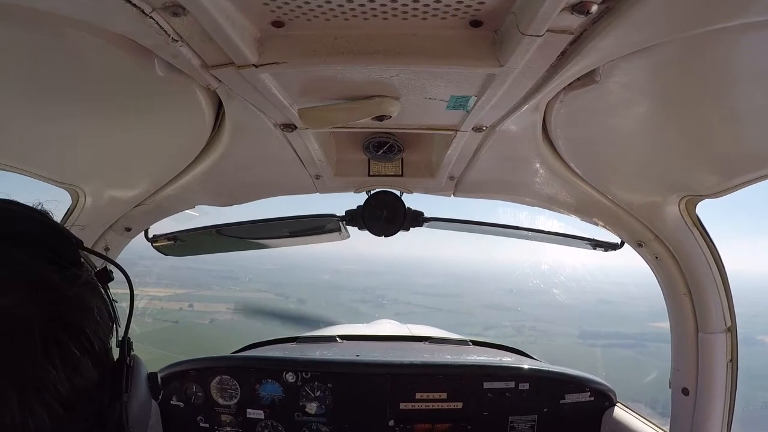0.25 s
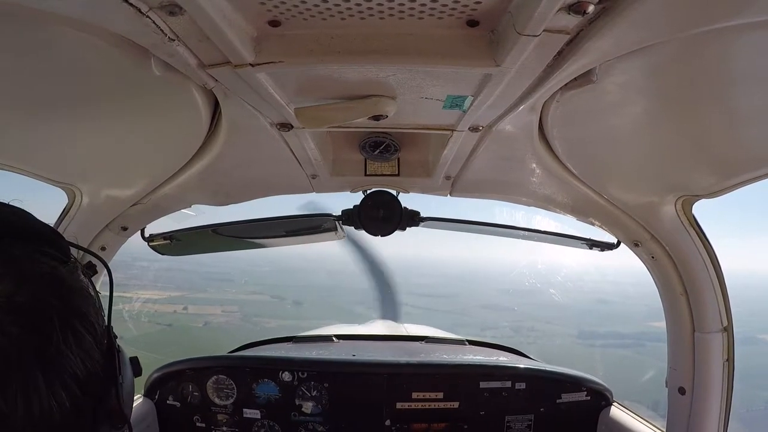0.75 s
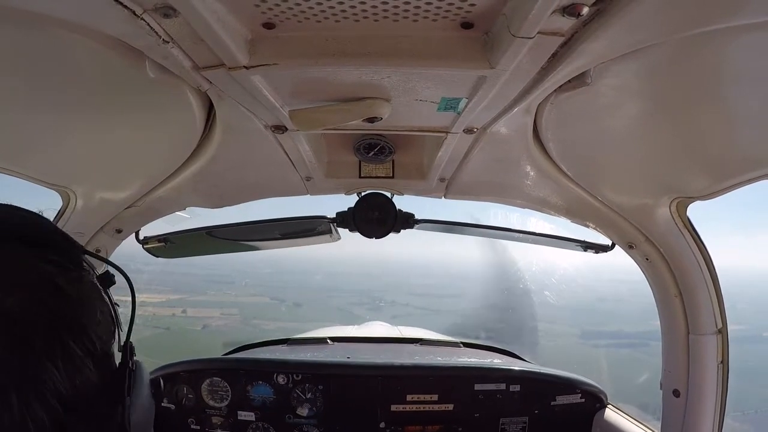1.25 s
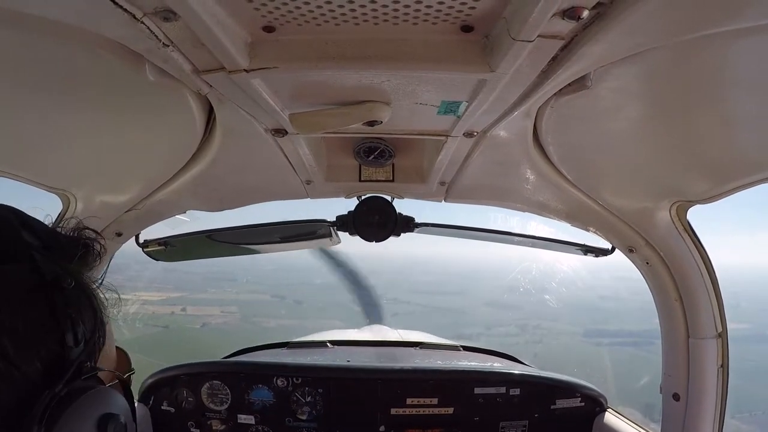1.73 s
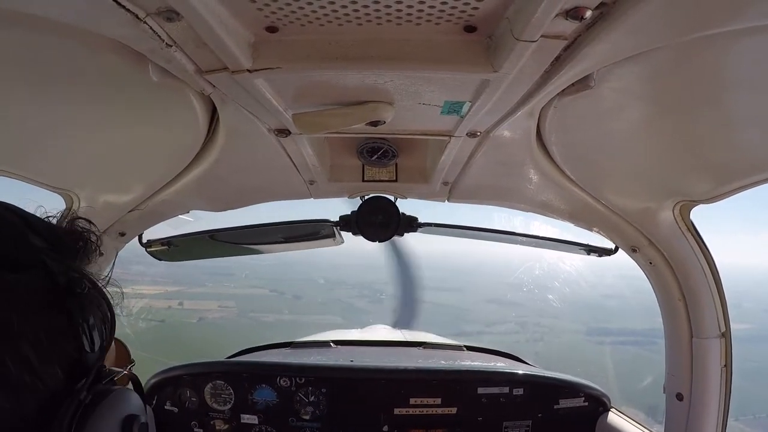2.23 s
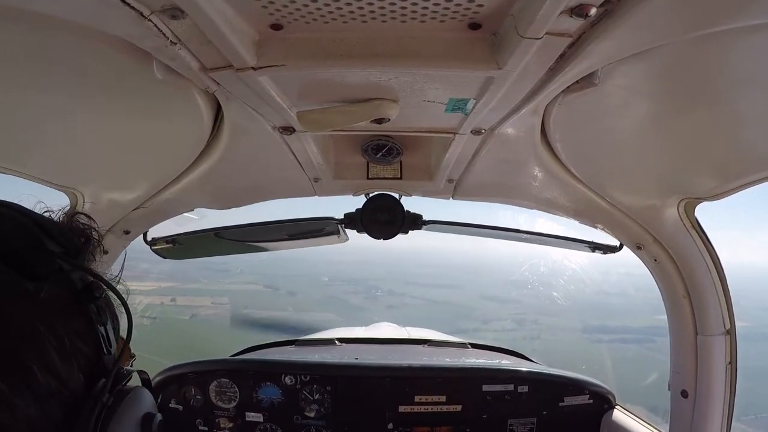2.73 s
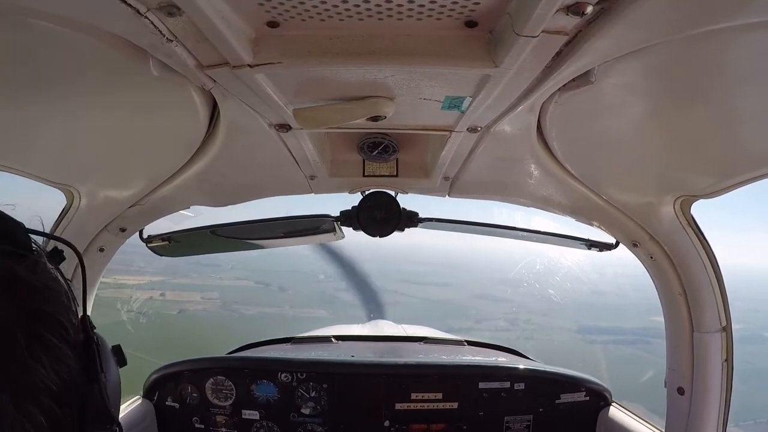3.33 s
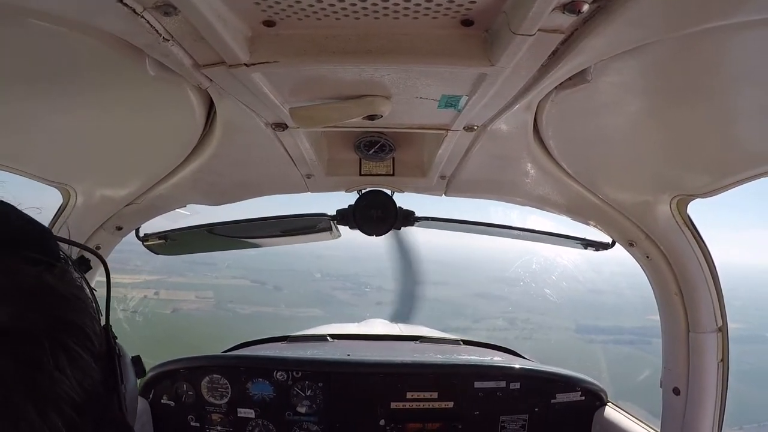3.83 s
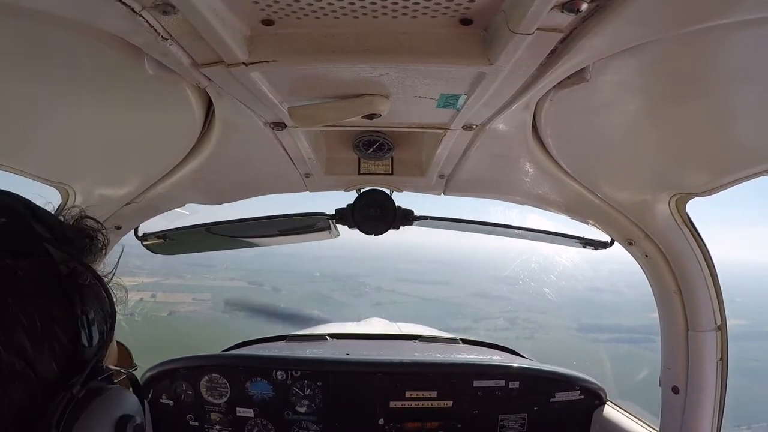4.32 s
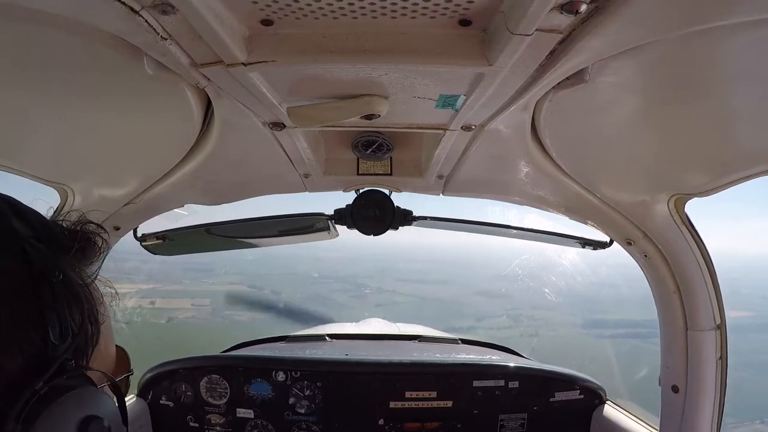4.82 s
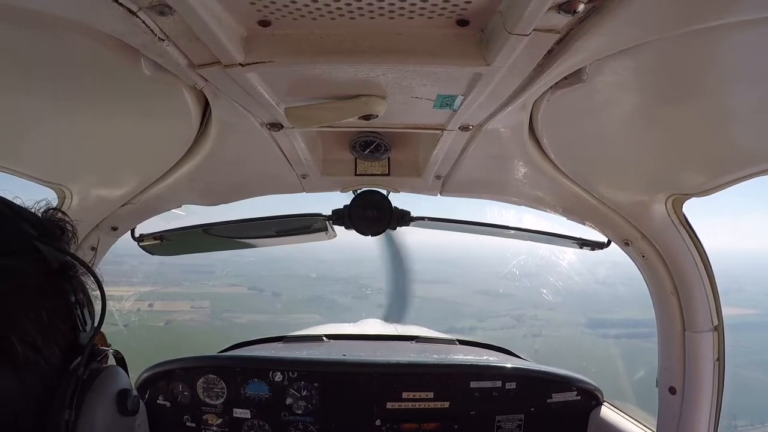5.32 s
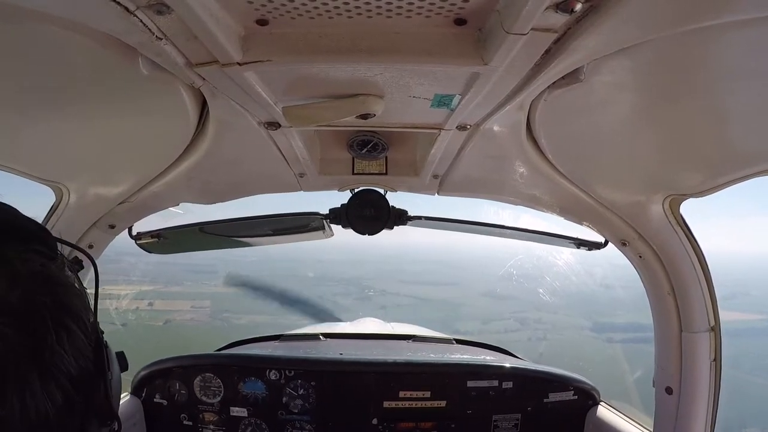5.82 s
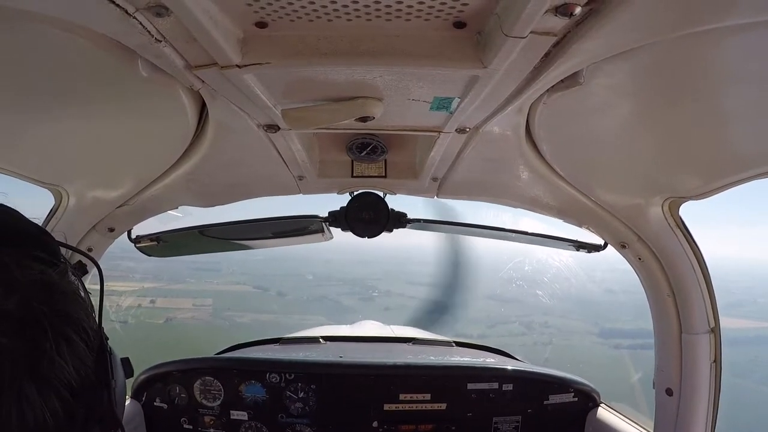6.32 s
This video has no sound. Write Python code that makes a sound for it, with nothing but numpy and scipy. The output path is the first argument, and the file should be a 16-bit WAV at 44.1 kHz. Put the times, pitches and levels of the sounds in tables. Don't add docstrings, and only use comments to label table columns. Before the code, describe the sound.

A low buzzing piston engine and propeller hum fills a light plane's cabin, easing down gradually amid airflow rumble, roar and faint hiss.

```python
import sys
import numpy as np
from scipy import signal
from scipy.io import wavfile
from scipy.ndimage import uniform_filter1d

SR = 44100
rng = np.random.default_rng(int(sys.argv[2]) if len(sys.argv) > 2 else 0)


def magnitude_from_level(level_db):
    exponent = np.asarray(level_db, float) / 20
    return 10 ** exponent


def master_out(mix):
    frames = np.transpose(np.atleast_2d(mix))
    ceiling = np.clip(frames, -1, 1)
    pcm = np.round(ceiling * 32767).astype(np.int16)
    wavfile.write(sys.argv[1], SR, pcm)


N = 289296
T = np.arange(N) / SR
CRUISE_HZ = 64.9

# start_s, length_s, firing_rate_fall_hz
THROTTLE_PULLS = [
    (.92, .92, 2.5),
    (2.02, 1.12, 3.8),
    (3.72, 1.05, 5.5),
]


def firing_hz():
    return CRUISE_HZ - sum(fall_hz * ramp(start_s, length_s) for start_s, length_s, fall_hz in THROTTLE_PULLS)


# mode_hz, width_hz, gain_db, phase_lag_below_turns
CABIN_MODES = [(90, 4, -5, .4), (97, 6, 3.5, 0), (113, 3.5, -9, .45), (119, 11, 4.5, .1), (187, 6, -3, .35),
               (194, 9, 15.5, 0), (247, 5, -5, .5), (256.5, 5, 8.5, .2)]


def cabin(hz):
    grid_hz = np.linspace(hz.min(), hz.max(), num=300)
    mode_hz, width_hz, mode_db, lag_turns = np.transpose(CABIN_MODES)
    detune = 2 * (grid_hz[:, None] - mode_hz) / width_hz
    gain_db = (mode_db / (1 + detune ** 2)).sum(axis=1)
    angle = (lag_turns * (2 * np.arctan(detune) - np.pi)).sum(axis=1)
    return np.interp(hz, grid_hz, gain_db), np.interp(hz, grid_hz, angle)


# time_s, level_db
FIRING_STUMBLES = [
    (.92, -0.8),
    (3.6, 0),
    (3.97, -2.5),
    (4.5, -1.8),
]
# firing_rate_multiple, slowest_rms_db, cruise_rms_db, phase_turns
ENGINE_ORDERS = [(.25, -37, -39, .1), (.5, -28.5, -29, .33), (.75, -21, -32, .36), (1, -14, -10.6, 0),
                 (1.25, -31, -27, .2), (1.5, -26, -26, .7), (1.75, -33, -39, .4), (2, -18.8, -27.5, .65),
                 (2.25, -36, -38, .6), (2.5, -36, -47, .1), (3, -33, -43.5, .64), (3.5, -49, -39, .3),
                 (4, -36, -30, .58), (5, -43, -37, .4), (6, -48, -43, .9)]


def engine():
    smooth_hz, smooth_width_hz, smooth_db = 62.2, 1.5, -8.5
    hz = firing_hz()
    speed = (hz - hz[-1]) / (hz[0] - hz[-1])
    mounts_db = smooth_db * np.exp(-((hz - smooth_hz) / smooth_width_hz) ** 2)
    load_db = bumps(FIRING_STUMBLES, width_s=0.096)
    turns = np.cumsum(hz * (1 + .003 * drift(6))) / SR
    out = np.zeros(N)
    for multiple, slow_db, cruise_db, phase_turns in ENGINE_ORDERS:
        cabin_db, cabin_angle = cabin(multiple * hz)
        level_db = slow_db + (cruise_db - slow_db) * speed + load_db + cabin_db
        if multiple not in (1, 1.5, 2):
            level_db += mounts_db
        waver_db = .9 if multiple % 1 == 0 else 1.4
        level_db += waver_db * drift(5)
        angle = 2 * np.pi * (multiple * turns + phase_turns) + cabin_angle
        out += np.sqrt(2) * magnitude_from_level(level_db) * np.cos(angle)
    return out


# time_s, level_re_mean_db
AIRFLOW_LEVEL = [
    (0, -0.5),
    (.4, 0.65),
    (1.15, 1),
    (2.1, -1.83),
    (3.3, -0.3),
    (4.0, 0),
    (4.4, 1.4),
    (5.15, -0.1),
    (6.56, -0.05),
]


def airflow_db():
    return played(AIRFLOW_LEVEL)[0]


# freq_hz, density_db_per_hz
RUMBLE_SPECTRUM = [(10, -31), (25, -5.5), (45, -4.5), (85, -1), (140, -6.5), (172, -14), (235, -10.5),
                   (290, -16), (450, -20.5), (700, -32), (1500, -90)]


def buffeting():
    level_db = -19.5 + 1.37 * airflow_db() + 0.18 * drift(2.4)
    return magnitude_from_level(level_db) * noise(RUMBLE_SPECTRUM, 0.93, size=8192)


# mode_hz, width_hz, level_db
PANEL_MODES = [(344.7, 40.6, -2), (371.6, 35, -5.5), (400, 50, -5.5)]
# time_s, level_re_rest_db
PANEL_GUSTS = [(.3, 5.5), (1.1, 1), (1.4, 3), (1.9, 3.5), (2.85, 4.5), (3.5, 2), (4.38, 5), (5.0, 1.5),
               (5.4, 7), (5.75, 4.5), (6.28, 3)]


def roof_panel():
    boom_db = -29.5 + bumps(PANEL_GUSTS, width_s=0.14)
    return sum(magnitude_from_level(boom_db + level_db) * whistle(mode_hz, width_hz) for mode_hz, width_hz, level_db in PANEL_MODES)


# freq_hz, density_db_per_hz
ROAR_SPECTRUM = [(280, -16), (480, -1.5), (613, -4.5), (743, -2.5), (1200, -4.5), (2250, -12.5),
                 (3430, -24.5), (3960, -17.5), (5050, -12), (6130, -16.5), (7240, -24), (8900, -22.5),
                 (9900, -36), (11300, -43), (15000, -56)]


def slipstream():
    return magnitude_from_level(-30 + airflow_db() + 0.79) * noise(ROAR_SPECTRUM, 0.48)


def main_vent():
    wash_hz = 24 * (firing_hz() - CRUISE_HZ)
    flip_hz = 270 * ramp(3.85, 0.22)
    vent_hz = 9120 + wash_hz - flip_hz + 40 * drift(2.5)
    return magnitude_from_level(-53 + airflow_db() + 0.92 * drift(8)) * whistle(vent_hz, width_hz=210)


# start_s, end_s, first_hz, last_hz, width_hz, level_db
PASSING_WHISTLES = [
    (0, 1.6, 9420, 9380, 170, -56.5),
    (0, 1.9, 8350, 8200, 450, -52),
    (2.9, 4.3, 8100, 8000, 350, -56),
    (1.9, 4.15, 12010, 12030, 90, -76),
    (4.2, 6.56, 10200, 10150, 300, -68),
]


def small_vents():
    out = np.zeros(N)
    for start_s, end_s, first_hz, last_hz, width_hz, level_db in PASSING_WHISTLES:
        fade = np.clip(np.minimum(T - start_s + 0.11, end_s - T + .1) / 0.14, 0, 1)
        hz = np.interp(T, [start_s, end_s], [first_hz, last_hz])
        out += fade * magnitude_from_level(level_db + drift(5.3)) * whistle(hz, width_hz)
    return out


# freq_hz, density_db_per_hz
SEAL_SPECTRUM = [(9000, -40), (11500, -10), (12800, -1), (14000, 0), (15000, -4), (16000, -20)]
# start_s, opening_s, shut_s, level_re_rest_db
SEAL_GAPES = [
    (.1, .7, .82, 9),
    (3.0, .9, 4.5, 10),
    (5.3, .7, 7, 8.5),
]


def door_seal():
    level_db = -73 + 2.0
    for start_s, opening_s, shut_s, gape_db in SEAL_GAPES:
        level_db = level_db + gape_db * (ramp(start_s, opening_s) - ramp(shut_s, .15))
    return magnitude_from_level(level_db) * noise(SEAL_SPECTRUM, .8)


def evened(x):
    return x / np.sqrt(np.mean(x ** 2) + 1e-20)


def played(rows):
    time_s, *columns = np.transpose(rows)
    return [np.interp(T, time_s, column) for column in columns]


def ramp(start_s, length_s):
    u = np.clip((T - start_s) / length_s, 0, 1)
    return u * u * (3 - 2 * u)


def bumps(rows, width_s):
    return sum(db * np.exp(-((T - time_s) / width_s) ** 2) for time_s, db in rows)


def drift(top_hz):
    coarse_s = np.arange(0, N / SR + .02, .01)
    waves = np.zeros(len(coarse_s))
    for hz in np.geomspace(top_hz / 12, top_hz, num=24):
        waves += np.sin(2 * np.pi * (hz * coarse_s + rng.random())) / np.sqrt(hz)
    return np.interp(T, coarse_s, evened(waves))


def noise(spectrum, patchy_db, size=2048):
    bin_hz = np.fft.rfftfreq(size, 1 / SR)
    freq_hz, density_db = np.transpose(spectrum)
    real, imag, patches = rng.standard_normal((4 * N // size + 5, len(bin_hz), 3)).T
    patches = uniform_filter1d(patches, size=8, axis=0)
    patches = evened(uniform_filter1d(patches, size=10, axis=1))
    level_db = np.interp(np.log(bin_hz + 1), np.log(freq_hz + 1), density_db)
    z = (real + 1j * imag) * magnitude_from_level(level_db[:, None] + patchy_db * patches)
    return evened(signal.istft(z, nperseg=size, noverlap=3 * size // 4)[1][:N])


def whistle(hz, width_hz):
    r = np.exp(-np.pi * width_hz / SR)
    slow = rng.standard_normal(N) + 1j * rng.standard_normal(N)
    slow = signal.lfilter([1], np.convolve([1, -r], [1, -r]), slow)
    carrier = np.exp(2j * np.pi * np.cumsum(hz * np.ones(N)) / SR)
    return evened((slow * carrier).real)


def scene():
    mix = engine() + buffeting() + roof_panel() + slipstream() + main_vent() + small_vents() + door_seal()
    return mix[None]


def roll_off(x):
    return signal.sosfilt(signal.butter(12, 15140, fs=SR, output="sos"), x)


def record(dry):
    power_db = 10 * np.log10(abs(uniform_filter1d(dry ** 2, size=4000)) + 1e-9)
    steady = dry * magnitude_from_level(-.25 * (power_db + 8.5))
    steady = steady * np.minimum(T / .004, 1)
    mix = 1.3 * np.tanh(steady / 1.3)
    return roll_off(mix)


dry = scene()
out = record(dry)
master_out(out)
```